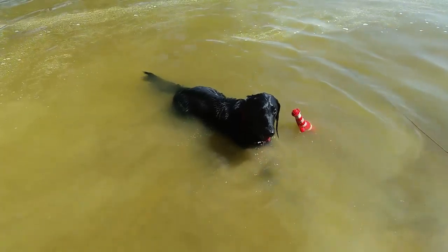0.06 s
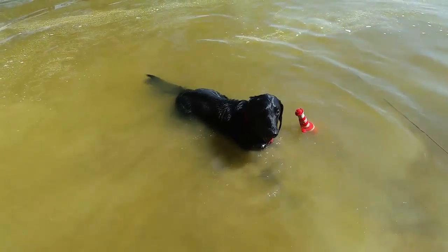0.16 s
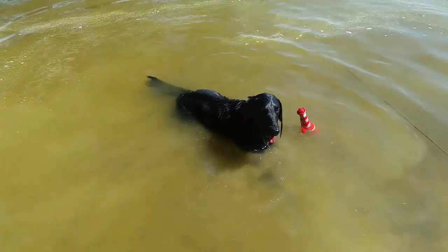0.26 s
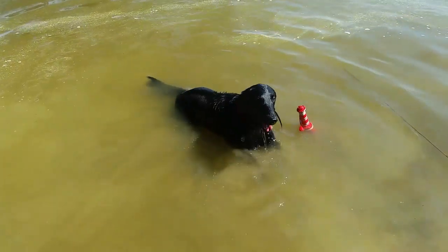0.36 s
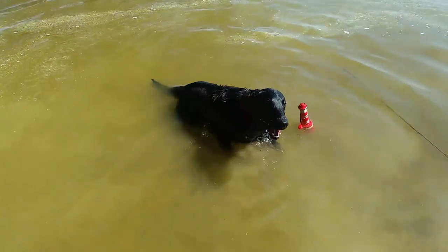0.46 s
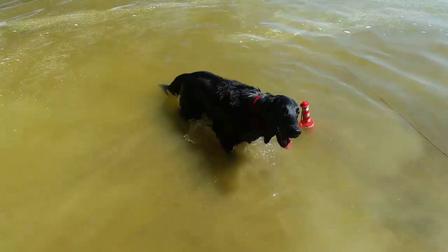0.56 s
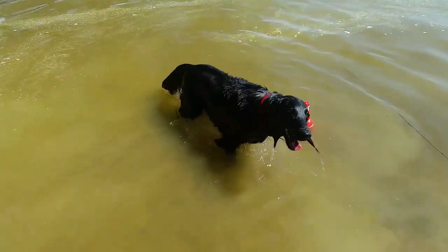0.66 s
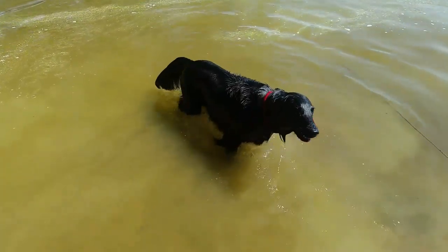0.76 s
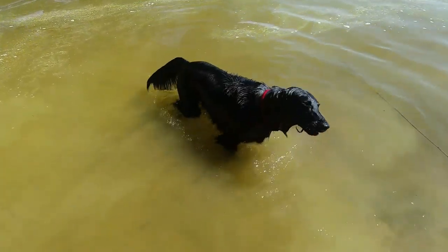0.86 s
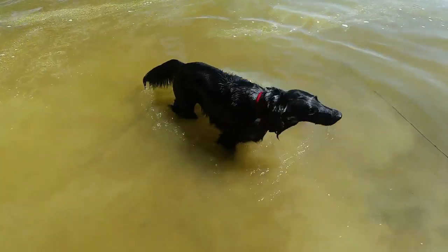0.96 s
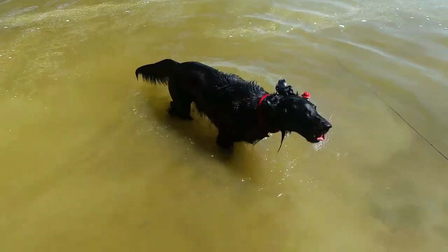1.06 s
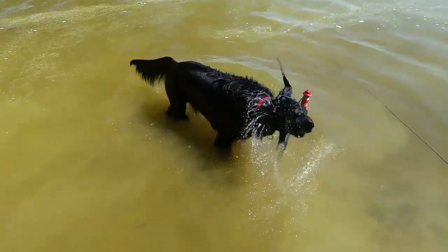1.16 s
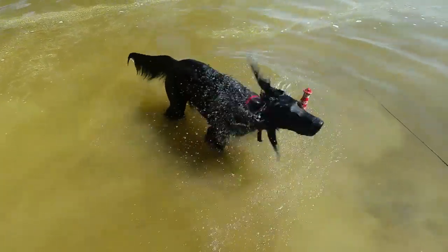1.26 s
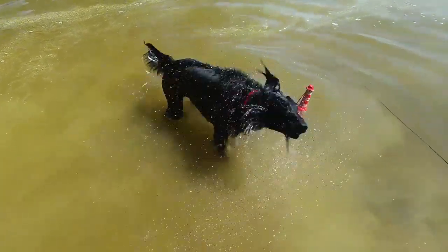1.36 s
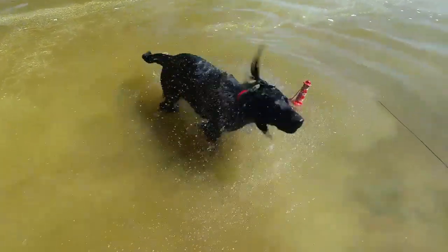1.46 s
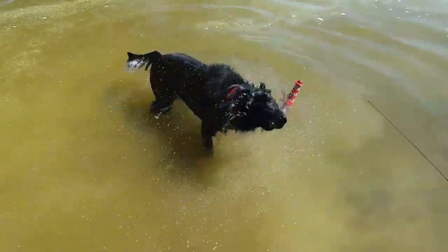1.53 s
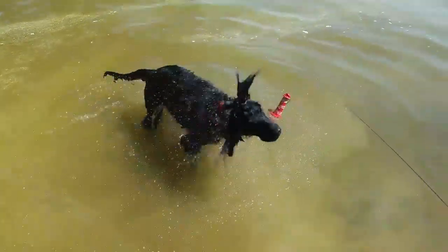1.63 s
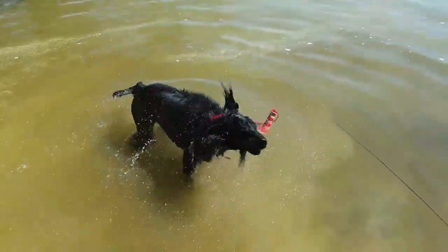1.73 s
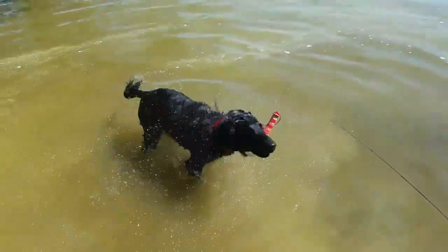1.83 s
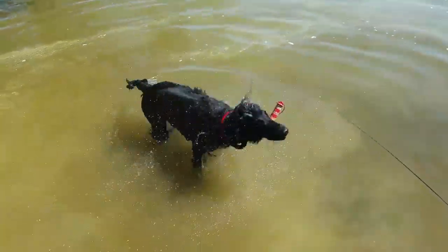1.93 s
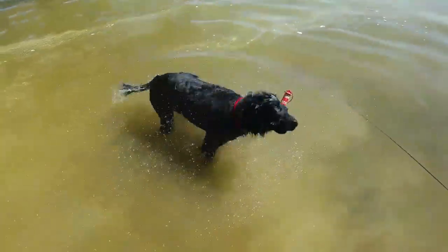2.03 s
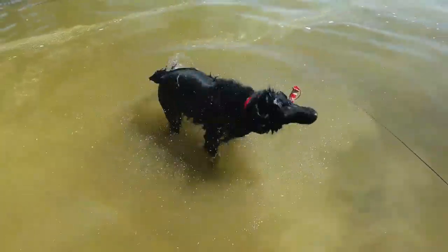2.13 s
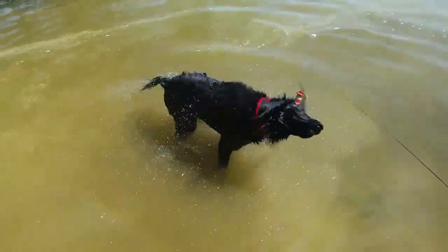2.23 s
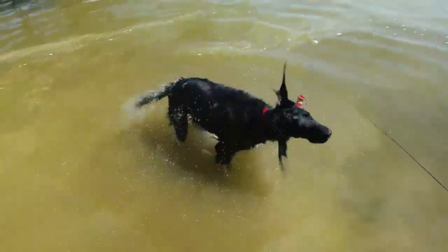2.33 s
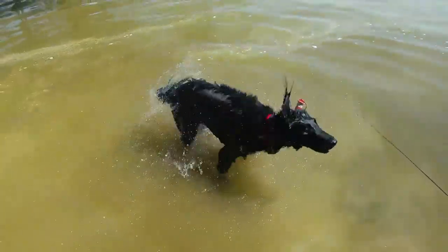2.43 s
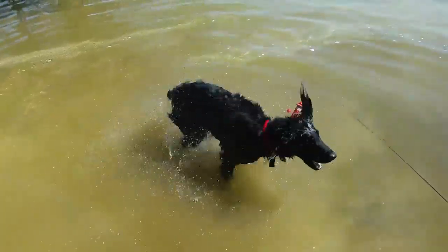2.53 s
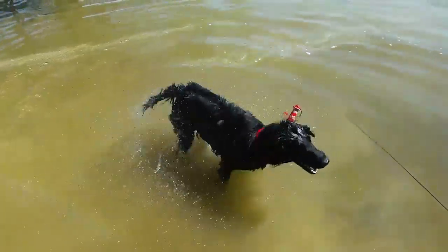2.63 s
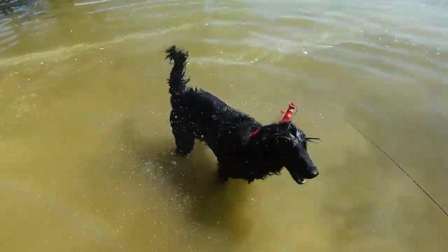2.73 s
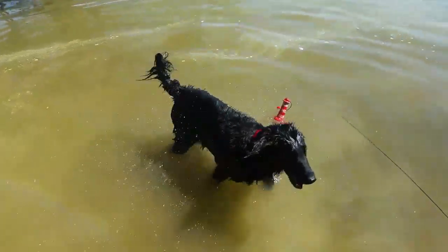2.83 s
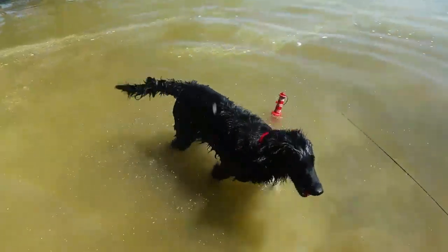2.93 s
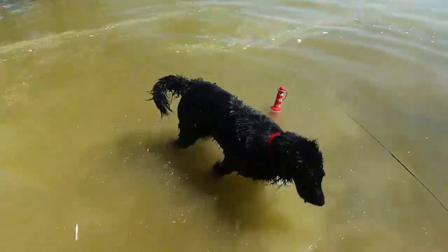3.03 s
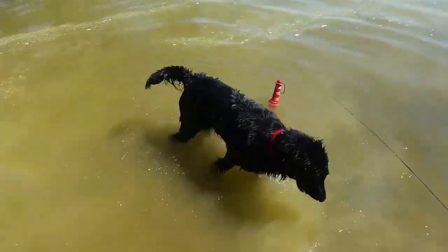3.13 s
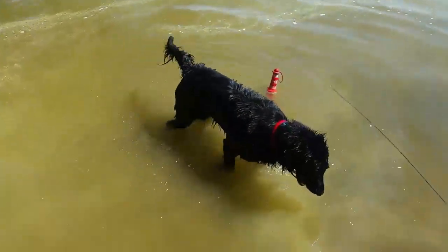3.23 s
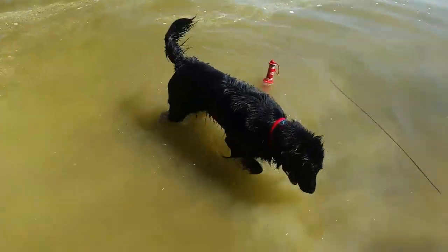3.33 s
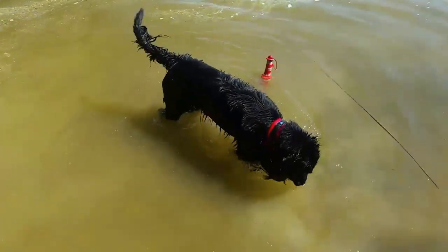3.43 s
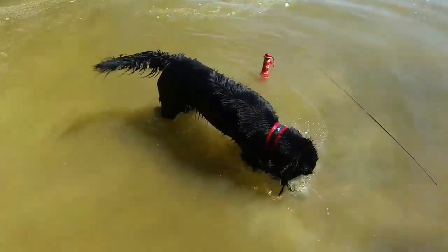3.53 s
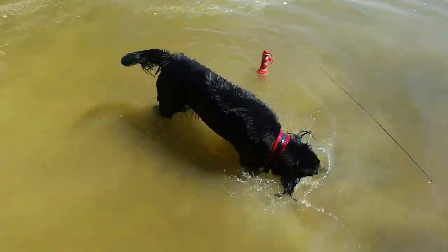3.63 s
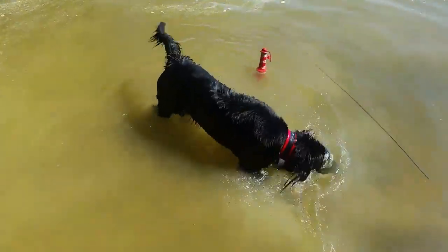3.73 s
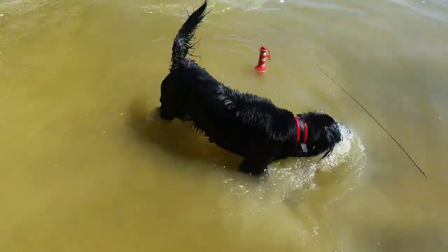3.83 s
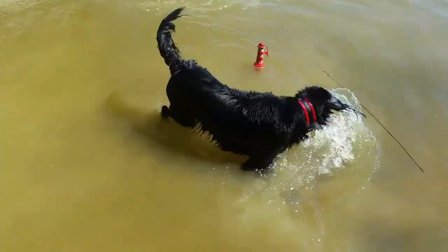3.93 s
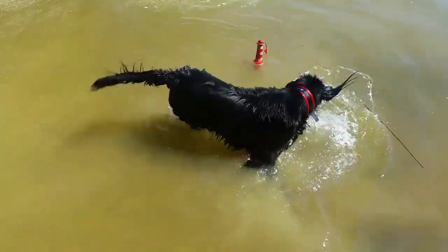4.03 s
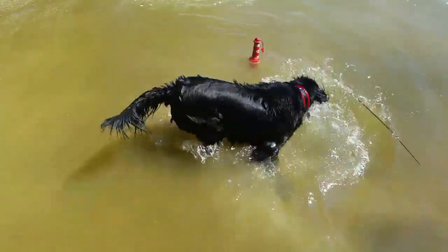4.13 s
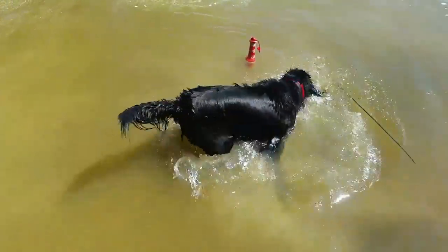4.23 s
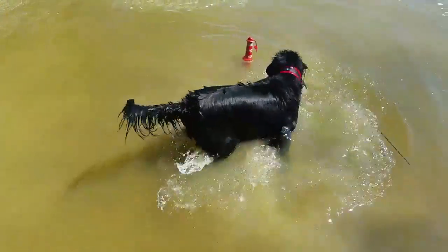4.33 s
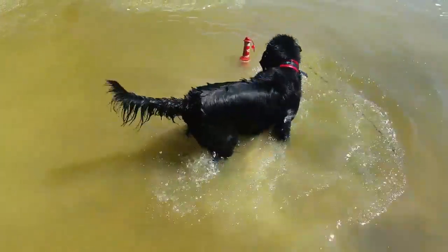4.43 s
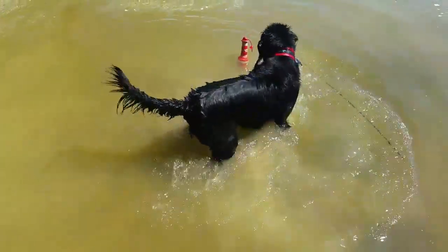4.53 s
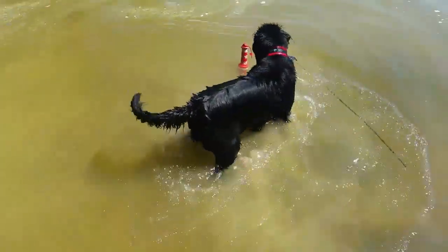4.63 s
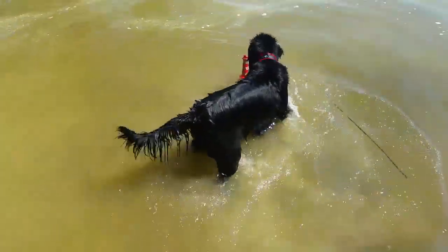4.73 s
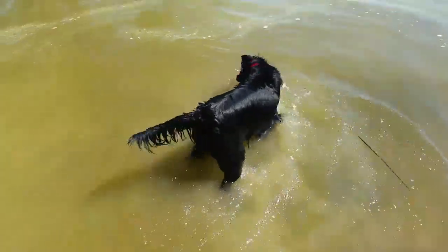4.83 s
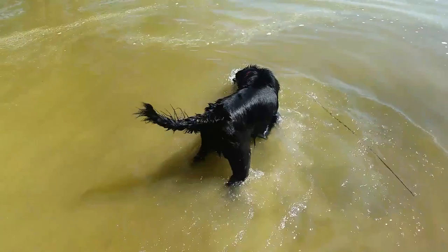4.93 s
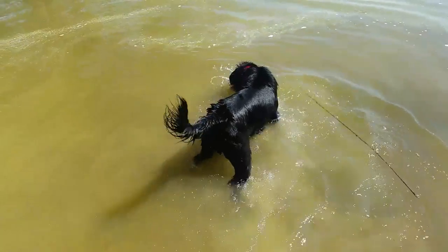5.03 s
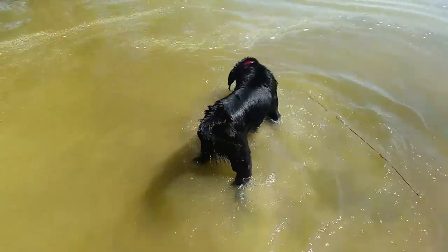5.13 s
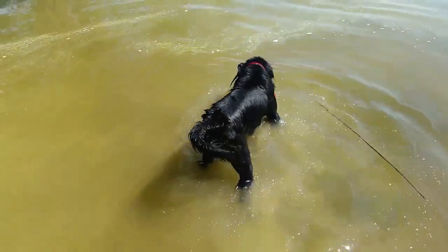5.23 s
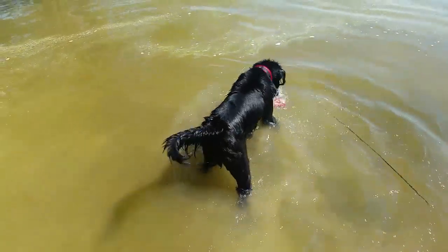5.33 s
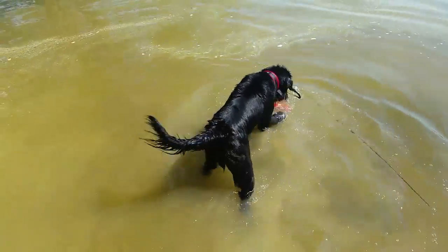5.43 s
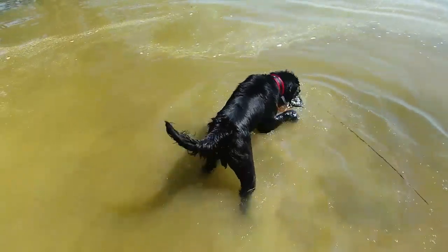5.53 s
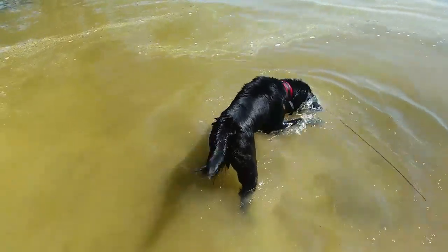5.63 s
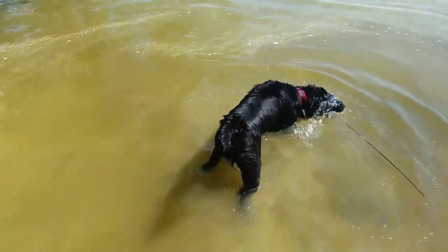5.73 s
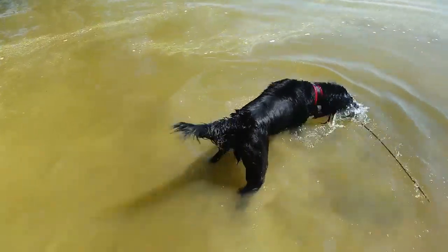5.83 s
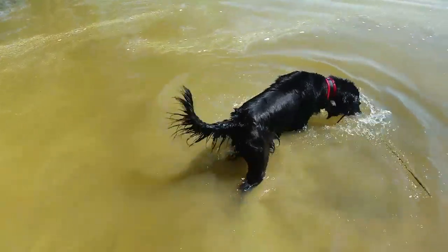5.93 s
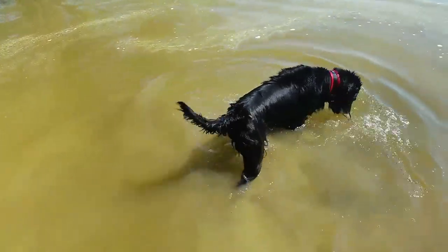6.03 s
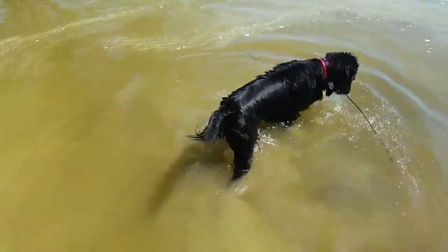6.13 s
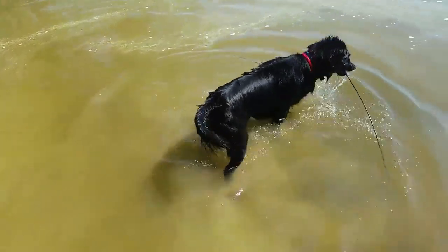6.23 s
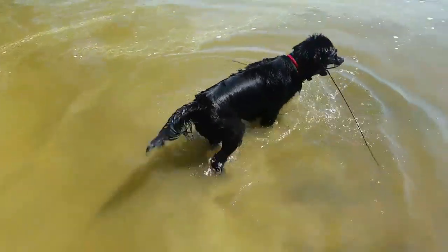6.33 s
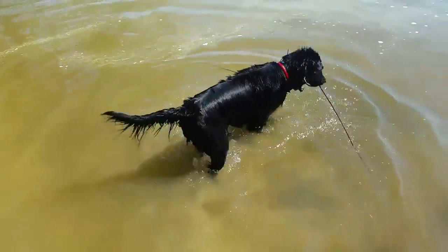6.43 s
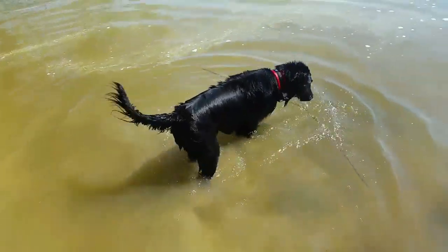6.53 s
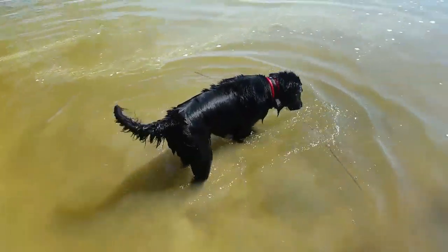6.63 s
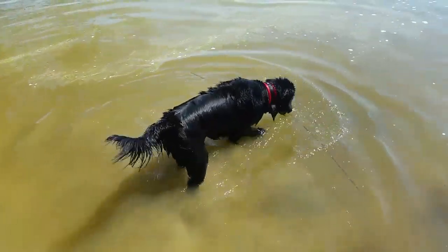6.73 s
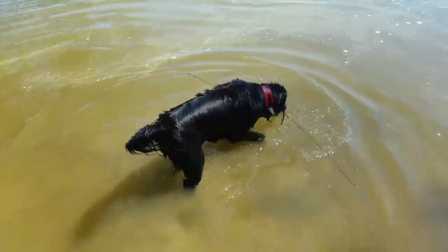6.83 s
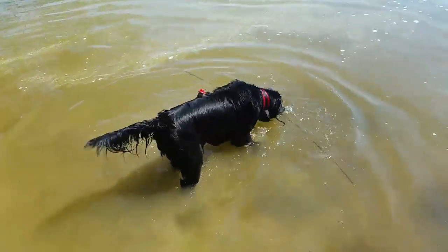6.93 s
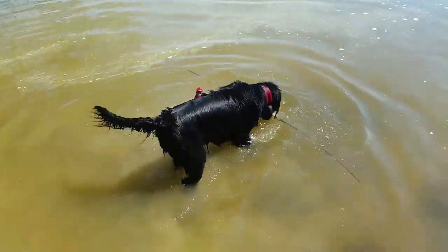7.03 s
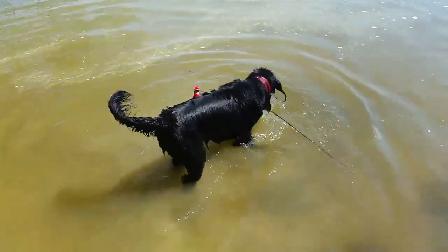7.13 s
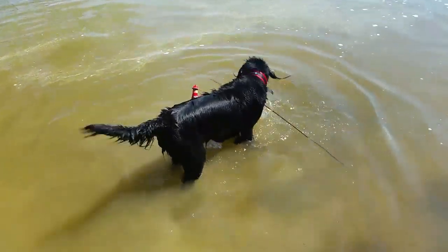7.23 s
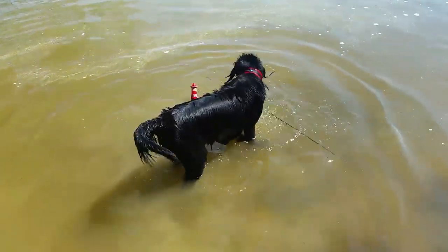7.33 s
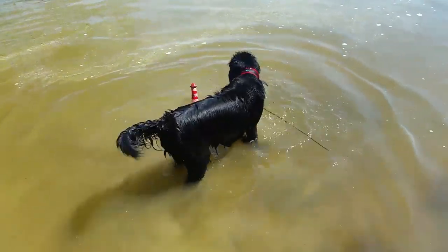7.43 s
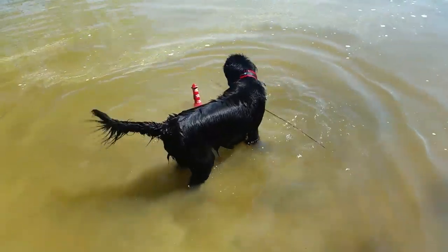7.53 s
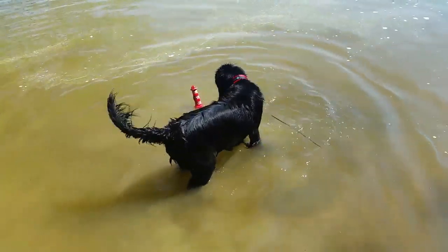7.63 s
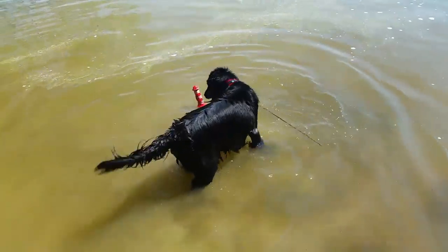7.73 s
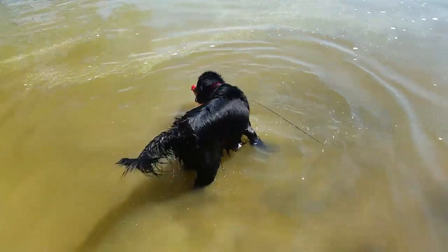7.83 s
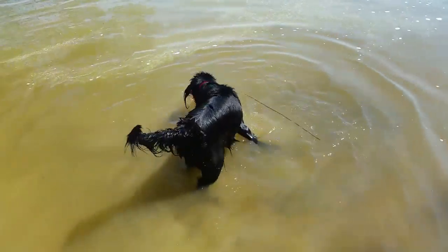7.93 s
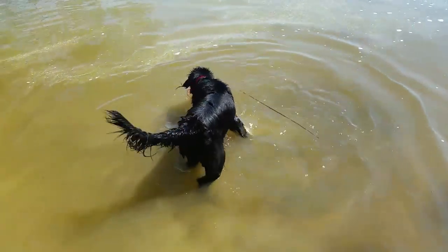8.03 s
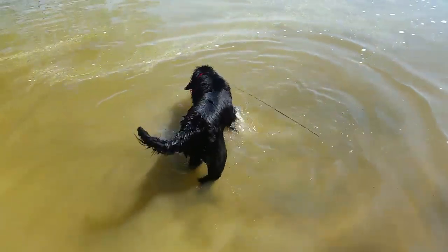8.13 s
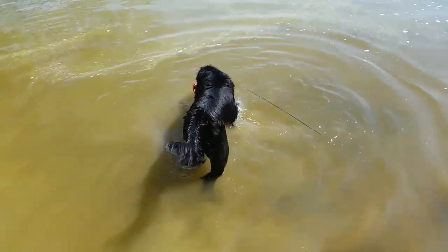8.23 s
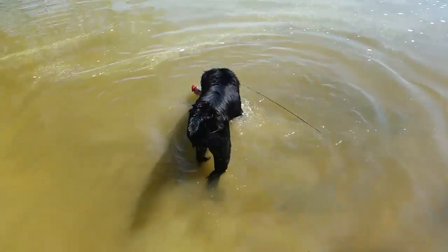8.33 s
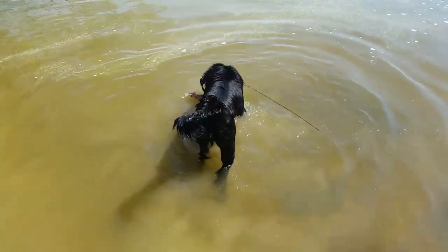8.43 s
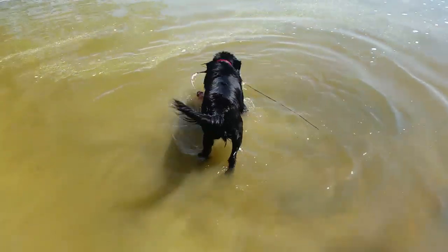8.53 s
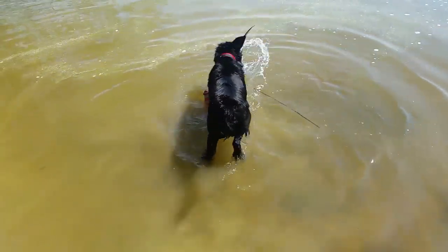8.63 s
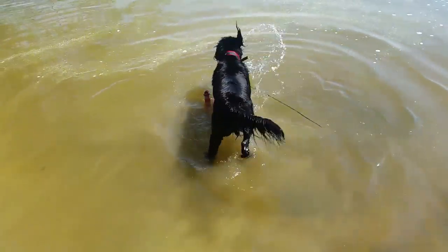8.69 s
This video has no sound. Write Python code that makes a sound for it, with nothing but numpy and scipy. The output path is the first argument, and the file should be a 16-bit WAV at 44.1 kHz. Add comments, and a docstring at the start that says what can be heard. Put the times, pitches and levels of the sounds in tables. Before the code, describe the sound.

Outdoors at a shallow lake, a dog moves close by; wind rumbles low and thumps softly on the microphone throughout, over faint shore wash and a thin steady hiss on the left. A small slosh opens, then near quiet; at 0.5-0.9 s the dog rises with splashes and draining water. At about 1.2 s wet lips flutter briefly, then from 1.3 to 2.5 s ears slap hard and evenly, about eleven times a second, amid fine spray. A deep plop and surge come at 3.0 s. From 3.55 to 4.4 s digging is busiest: gulps, splats, churning and showers of drops, with strong wind thumps. Looser wading follows, with more splashing at 5.8-6.3 s. It then thins to occasional gurgles, with four faint distant bird peeps between 6.7 and 7.5 s. Small plinks and drips gather around 8-8.4 s; a cluster of hollow gulps at 8.6 s ends it.

```python
"""Wet dog shaking and wading

A dog stands up in a shallow lake and shakes: filtered impacts flutter its lips, hard pulses slap its ears.
It wades and digs for a stick: ringing bubbles gulp and plink, noise bursts splat, tiny pings rain as spray.
Low filtered noise rumbles and thumps as wind on the microphone, a thin noise band hisses on the left,
a faint wash lies along the shore and gliding sines peep four times as a far bird."""
import sys
import numpy as np
from scipy import signal
from scipy.fft import rfft, irfft
from scipy.io import wavfile
from scipy.ndimage import uniform_filter1d

SR = 44100
rng = np.random.default_rng(int(sys.argv[2]) if len(sys.argv) > 2 else 0)


def digitize_waveform(pressure):
    """Quantize a signal to 16-bit integers and store it at the path in sys.argv[1].

    Rows of a 2-D input are taken as channels; values are limited to [-1, 1].
    """
    field = np.atleast_2d(pressure).T
    bounded = np.clip(field, -1, 1)
    quanta = np.round(bounded * 32767).astype(np.int16)
    wavfile.write(sys.argv[1], SR, quanta)


N = 386316  # length in samples


def from_db(db):
    """Decibels to gain."""
    return 10 ** (np.asarray(db) / 20)


def rms_one(x):
    """Scale to unit rms."""
    return x / np.sqrt(np.mean(x ** 2) + 1e-20)


def in_time(rows):
    """Each column of an automation curve at every sample."""
    s, *columns = np.transpose(rows)
    return [np.interp(np.arange(N) / SR, s, c) for c in columns]


def drift(rate):
    """Smooth random modulation with about `rate` turns a second; unit rms."""
    knots = rng.standard_normal(4000)
    return rms_one(np.interp(np.arange(N) / SR * rate, np.arange(len(knots)), knots))


def add(out, s, sound):
    """Mix a sound in at a time."""
    i = int(np.clip(s * SR, 0, out.shape[-1] - 1))
    out[..., i:i + sound.shape[-1]] += sound[..., :out.shape[-1] - i]


def swell(t, attack_s, hold_s, release_s):
    """Attack, hold and release; silent before t = 0."""
    t = np.maximum(t, 0)
    attack = 1 - np.exp(-t / max(attack_s, 1e-4))
    release = np.exp(-np.maximum(t - hold_s, 0) / max(release_s, 1e-4))
    return attack * release


def colour(x, points, share=1, size=4096):
    """Causal (minimum-phase) EQ through (Hz, dB) points; share scales the dB."""
    hz, db = np.transpose(points)
    grid = np.maximum(np.arange(size // 2 + 1) * SR / size, 1)
    curve_db = share * np.interp(np.log(grid), np.log(hz), db)
    # folding the cepstrum onto positive time makes the phase minimal
    cepstrum = irfft(np.log(from_db(curve_db)))
    cepstrum[1:size // 2] *= 2
    cepstrum[size // 2 + 1:] = 0
    response = irfft(np.exp(rfft(cepstrum)))
    return signal.oaconvolve(np.atleast_2d(x), response[None], axes=1)[:, :x.shape[-1]]


def tilted(points, db_per_octave):
    """A colour made brighter or duller about 1 kHz."""
    return [(hz, db + db_per_octave * np.log2(hz / 1000)) for hz, db in points]


RESONANCE_OCTAVES = 0.33  # from the centre to half the lift in dB


def peaked(points, centre_hz, lift_db):
    """A colour with one broad resonance added."""
    hz, db = np.transpose(points)
    grid = np.geomspace(50, 20000, 90)
    lift = lift_db / (1 + (np.log2(grid / centre_hz) / RESONANCE_OCTAVES) ** 2)
    return np.column_stack([grid, np.interp(np.log(grid), np.log(hz), db) + lift])


def steady(x, window_s):
    """Level out over a short window, so that mainly the fine grain is left."""
    power = uniform_filter1d(np.mean(x, axis=0) ** 2, max(int(window_s * SR), 8))
    return x / np.sqrt(np.abs(power) + 0.0011 * np.mean(power))


def impacts(per_s, spread_db, scatter_s, pan_db):
    """Random drop impacts of uneven size; each lands elsewhere, with its own lag and balance."""
    at = np.flatnonzero(rng.random(N) < per_s / SR)
    draws = rng.standard_normal((4, N // 8))
    lag, pan, a, b = draws[:, at % draws.shape[1]]
    rarity = np.minimum((a * a + b * b) / 2, 4.5)  # exponential in dB
    size = np.sign(a) * from_db(spread_db * rarity)
    right_at = np.clip(at + np.round(lag * scatter_s * SR).astype(int), 0, N - 1)
    out = np.zeros((2, N))
    out[0, at] = size * from_db(pan_db * pan)
    out[1, right_at] = size * from_db(-pan_db * pan)
    return out


def bubble(hz, cycles, rise, attack):
    """An air pocket swells, rings and dies; its pitch rises as it nears the surface. Peak about 1."""
    age = np.arange(int(6 * cycles / hz * SR)) / SR * hz / cycles  # in decay times, as is the attack
    envelope = (1 - np.exp(-(age / attack) ** 2)) * np.exp(-age)
    ring = np.sin(2 * np.pi * cycles * (age + rise * (age ** 2 / 2 - age)))
    return envelope / envelope.max() * ring


def bubble_cloud(low_hz, high_hz, cycles, spread_db, rise, count, size=N):
    """Bubbles of all sizes are born at random around the legs."""
    out = np.zeros((2, size))
    for when, pitch, strength, life, place, sign in rng.random((count, 6)):
        hz = low_hz * (high_hz / low_hz) ** pitch
        ring = bubble(hz, cycles * 2 ** (2 * life - 1), rise, attack=0.32)
        rarity = -np.log(strength + .03)
        ring *= np.sign(sign - .5) * from_db(spread_db * rarity)  # most are faint, a few louder
        add(out[0], when * size / SR, ring)
        add(out[1], when * size / SR + (place - .5) * 0.0003, ring)
    return out


def burst(attack_s, decay_s, points, alike, ragged_db=0, size=4096):
    """A crackle of water that swells and dies in uneven spurts; its mono rms is 1 over the first 5 ms."""
    t = np.arange(size) / SR
    knots = np.clip(rng.standard_normal(64), -1.5, 1.5)
    spurts = np.interp(t, np.linspace(0, t[-1], 64), knots)
    envelope = (1 - np.exp(-(t / attack_s) ** 2)) * np.exp(-t / max(decay_s, 1e-4))
    envelope = envelope * from_db(ragged_db * spurts * (1 - np.exp(-t / decay_s)))
    mid, side = rng.standard_normal((2, size)) * envelope
    alike = np.clip(alike, 0, 1)  # 1 makes both channels equal
    x = colour(np.sqrt(1 + alike) * mid + np.sqrt(1 - alike) * side * [[1], [-1]], points)
    return x / np.sqrt(np.mean(x.mean(axis=0)[t < .005] ** 2))


# wet ears smack at every half turn of the shake:
# [t/s, level/dB before layer trims, decay/s, hollow under the ear f/Hz, brightness/dB per octave]
SLAPS = [(1.282, -25, 0.0073, 1100, 5.5), (1.385, -19.5, 0.0024, 900, 0.5), (1.486, -17, 0.0023, 1950, 3),
         (1.581, -23.5, 0.0049, 990, 2), (1.672, -24, 0.0045, 700, -0.5), (1.763, -21.5, 0.0012, 930, 0.5),
         (1.852, -20, 0.0011, 980, 0.5), (1.946, -26.5, 0.0014, 1300, 0), (2.03, -21.5, 0.0011, 1530, 2.5),
         (2.117, -15, 0.0016, 990, 1.5), (2.201, -17, 0.0022, 835, 0.5), (2.292, -18.5, 0.0022, 1000, 0),
         (2.373, -20.5, .002, 950, -1), (2.457, -30, 0.0054, 1600, -0.5), (2.536, -23, 0.0036, 1400, 1)]
# body of a smack [f/Hz, level/dB]
SLAP_COLOUR = [(80, 0), (250, 6.5), (550, -7), (950, 3.5), (1300, -5.5), (1600, -8), (2200, -2.5),
               (2900, -17), (3800, -11), (6000, -18.5), (12000, -37)]
HOLLOW_DB = 4  # lift at the pitch of the hollow
# spray noise at each smack, before layer trims
SPRAY_DECAY_S, SPRAY_DB, SPRAY_GROWTH_DB_PER_S = 0.0023, -18, 0.1


def slaps():
    """Wet fur smacks: a hard pulse and ragged spatter, each in its own tone; faint spray noise swells around it."""
    out = np.zeros((2, N))
    for s, level_db, decay_s, hz, brightness_db in SLAPS:
        tone = peaked(tilted(SLAP_COLOUR, brightness_db), hz, HOLLOW_DB)
        smack = colour(signal.unit_impulse(2048), tone)
        spray_db = SPRAY_DB + SPRAY_GROWTH_DB_PER_S * (s - SHAKE_START_S)
        add(out, s + 0.001378, from_db(level_db + 2.0) * smack / np.abs(smack).max())
        add(out, s, from_db(level_db - 4.0) * burst(0.0013, decay_s, tone, alike=0.95, ragged_db=4))
        add(out, s, from_db(level_db - 17.5) * burst(0.00094, 0.012, tone, alike=0.64, ragged_db=9))
        short_spray = burst(0.0012, SPRAY_DECAY_S, SPRAY_COLOUR, alike=0.089, ragged_db=4.0)
        faint_spray = burst(0.0038, 0.0094, SPRAY_COLOUR, alike=0.099, ragged_db=10.0)
        add(out, s, from_db(spray_db - 6.5) * short_spray)
        add(out, s - .007, from_db(spray_db - 20.0) * faint_spray)
    return out


# the hollow of the mouth colours the flutter [f/Hz, level/dB]
FLUTTER_COLOUR = [(200, 2.5), (550, -12), (700, 2), (780, 6.5), (940, -8.5), (1200, -32), (1650, -9),
                  (1900, -20), (2600, -36), (6000, -48)]
FLUTTER_START_S, FLUTTER_LENGTH_S, FLUTTER_DB = 1.177, 0.079, -30  # as the head starts to turn


def flutter():
    """Wet lips flap in a quick uneven run and ring in the mouth."""
    flaps = impacts(per_s=500, spread_db=2.0, scatter_s=.00005, pan_db=-0.5)[:, :SR // 3]
    flaps = colour(flaps, FLUTTER_COLOUR)
    t = np.arange(SR // 3) / SR
    envelope = swell(t, attack_s=0.0016, hold_s=FLUTTER_LENGTH_S, release_s=0.024)
    out = np.zeros((2, N))
    add(out, FLUTTER_START_S, from_db(FLUTTER_DB) * envelope * steady(flaps, window_s=0.043))
    return out


# the dog stands up and its coat drains, before MOVING_DB:
# [t/s, low gurgle level/dB, mid splashing level/dB, high spray level/dB]
RISING = [(0.0, -37, -38.5, -50.5), (0.1, -53.5, -53, -71), (0.192, -63, -77, -69), (0.42, -54, -61, -77),
          (0.55, -46.5, -52, -57), (0.678, -37, -45.5, -48.5), (0.86, -47.5, -50, -50.5),
          (0.92, -51, -62, -56), (1.15, -59, -61, -65)]
# it wades and digs for the stick, before MOVING_DB:
# [t/s, low gurgle level/dB, mid splashing level/dB, high spray level/dB]
WADING = [(2.85, -39.5, -46.5, -46), (3.01, -44, -47, -47.5), (3.21, -50, -51.5, -60.5),
          (3.489, -42.5, -50, -49), (3.79, -37, -54.5, -52.5), (3.92, -38, -44.5, -44),
          (4.28, -35.5, -40.5, -36.5), (4.63, -41.5, -47, -47), (4.84, -43.5, -54.5, -51.5),
          (5.04, -44, -60, -50.5), (5.43, -44.5, -48, -53), (5.71, -42.5, -51.5, -48.5),
          (5.96, -38, -42.5, -47), (6.12, -34.5, -39, -39), (6.26, -41, -49.5, -48),
          (6.57, -48.5, -44, -45), (6.78, -57, -57.5, -55), (7.24, -48, -52.5, -60),
          (7.49, -56.5, -61, -61.5), (7.72, -49.5, -56, -67.5), (7.87, -45, -49, -60),
          (8.22, -49.5, -51, -55.5), (8.35, -36.5, -46, -49.5), (8.48, -39, -52, -57),
          (8.76, -57, -51, -53)]
# triples run gurgle, splashing, spray; each layer adds its own trim later
MOVING_DB = (-0.5, 0, -2.5)  # gain on both movements
SHAKE_START_S, SHAKE_END_S, SHAKE_ATTACK_S, SHAKE_RELEASE_S = 1.117, 2.744, 0.14, 0.02
SHAKE_DB = (-41, -46.5, -36.5)
# from head to rump the splashing grows while gurgle and spray fall
SHAKE_GROWTH_DB_PER_S = (-11.5, 2.5, -0.84)
SHAKE_PULSE_DB, SHAKE_PULSE_LAG = 1, .12  # swing; delay after each smack, share of a half turn
WAKE_DB, WAKE_DECAY_S = (-10, -12, -16), 0.1  # against the surge that leaves the wake


def agitation():
    """Levels of gurgle, splashing and spray (dB): movements, pulsing shake and surge wakes add as power."""
    t = np.arange(N) / SR
    shake_length_s = SHAKE_END_S - SHAKE_START_S
    shake = swell(t - SHAKE_START_S, SHAKE_ATTACK_S, shake_length_s, SHAKE_RELEASE_S)
    half_turns = np.interp(t, [row[0] for row in SLAPS], np.arange(len(SLAPS)))
    pulse = np.cos(2 * np.pi * (half_turns - SHAKE_PULSE_LAG)) - .5
    shake = shake * from_db(SHAKE_PULSE_DB * pulse)
    shaken_s = np.clip(t, SHAKE_START_S, SHAKE_END_S) - SHAKE_START_S
    wake_power = sum((from_db(db) * swell(t - s, length_s, length_s, WAKE_DECAY_S)) ** 2
                     for s, db, _, length_s, _ in SURGES)
    levels = []
    for moving, gain_db, shake_db, growth_db, wake_db in zip(
            in_time([*RISING, *WADING]), MOVING_DB, SHAKE_DB, SHAKE_GROWTH_DB_PER_S, WAKE_DB):
        moving_power = from_db(moving + gain_db) ** 2
        shake_power = (from_db(shake_db + growth_db * shaken_s) * shake) ** 2
        levels.append(10 * np.log10(moving_power + shake_power + from_db(wake_db) ** 2 * wake_power))
    return levels


# fine spray, also heard at each slap [f/Hz, level/dB]
SPRAY_COLOUR = [(1500, -4), (2900, -12), (3700, -7.5), (4900, -3), (6200, -9.5), (7800, -2), (9000, -5.5),
                (12000, 5), (14000, 0), (16000, -4.5)]


def spray(level_db):
    """Fine drops rain back, each pinging briefly in one band; more spray means more drops a second."""
    per_s = 1300 * from_db(0.37 * (level_db + 38.5) + 6.5 * drift(60))
    edges = np.geomspace(2000, 16000, 10)
    pings = np.zeros((2, N))
    for band in zip(edges, edges[1:]):
        ringing = signal.butter(2, band, "band", fs=SR, output="sos")
        hits = impacts(per_s, spread_db=4.5, scatter_s=.00006, pan_db=3.0)
        pings += signal.sosfilt(ringing, hits + 1e-18)
    patter = steady(colour(pings, SPRAY_COLOUR), window_s=0.17)
    mist = rms_one(colour(rng.standard_normal((2, N)), SPRAY_COLOUR))
    return from_db(level_db - 2.0) * (patter + mist)


# breaking water [f/Hz, level/dB]
SPLASH_COLOUR = [(450, -3), (800, 3), (1050, -5), (1300, -6), (1650, 5.5), (2100, 5), (2450, 0.5),
                 (2900, -5), (3700, -5), (5000, -16), (8000, -39)]


def splash(level_db):
    """Breaking water: small bubbles and sharp splats that come in flurries."""
    bubbles = bubble_cloud(925.0, 4874, cycles=7.4, spread_db=4.0, rise=0.019, count=5500)
    bubbles = rms_one(colour(bubbles, SPLASH_COLOUR))
    sharp = impacts(per_s=2200, spread_db=1.5, scatter_s=.00005, pan_db=5.5)
    sharp = rms_one(colour(sharp * from_db(4.1 * drift(70)), SPLASH_COLOUR))
    return from_db(level_db - 0.9) * steady(bubbles + from_db(-2.0) * sharp, window_s=0.17)


# churned water [f/Hz, level/dB]
GURGLE_COLOUR = [(120, -18.5), (230, 0), (400, 3), (580, 2.5), (800, 6.5), (1000, 2.5), (1300, 0.5),
                 (2000, -64.5)]


def gurgle(level_db):
    """Churned water: large bubbles over the patter of falling lumps of water."""
    bubbles = bubble_cloud(219.0, 1135, cycles=4.06, spread_db=5.5, rise=0.07, count=2600)
    bubbles = rms_one(colour(bubbles, GURGLE_COLOUR))
    lumps = impacts(per_s=1500, spread_db=4.5, scatter_s=.00008, pan_db=4.5)
    lumps = rms_one(colour(lumps, GURGLE_COLOUR))
    return from_db(level_db) * steady(bubbles + from_db(-10.0) * lumps, window_s=0.086)


# a sheet of water is thrown up and collapses:
# [t/s, level/dB, swell/s, length/s, brightness/dB per octave]
SURGES = [(0.0, -48, .003, 0.048, 2.5), (0.492, -33, 0.012, 0.076, 0.5), (0.713, -41, 0.0024, 0.027, 4.5),
          (1.137, -39, .003, 0.0088, -1.5), (2.424, -33.5, 0.0051, 0.037, 3),
          (2.546, -41, .003, 0.063, 5.5), (3.038, -27, 0.015, 0.059, -2.5),
          (3.554, -33.5, 0.021, 0.07, -0.5), (3.603, -39, 0.0037, 0.069, 8),
          (3.691, -37.5, 0.0028, 0.051, 6), (4.13, -27, 0.021, 0.027, 2), (4.383, -43, .003, 0.053, 3),
          (4.625, -37.5, 0.0034, 0.018, -1), (4.819, -33, 0.0033, 0.053, -8),
          (4.964, -40.5, 0.002, 0.039, 3.5), (5.829, -29.5, 0.0073, 0.042, -8),
          (5.976, -40.5, .006, 0.14, -1.5), (7.95, -40.5, 0.0027, 0.018, -2),
          (8.318, -42, 0.0054, 0.033, -10), (8.532, -29.5, 0.021, 0.098, -6.5)]
# rushing water [f/Hz, level/dB]
SURGE_COLOUR = [(150, -4), (400, 2.5), (580, -0.5), (820, 9), (1050, 2.5), (1350, -0.5), (1650, 1.5),
                (2150, 0.5), (2900, -13.5), (3800, -9.5), (6000, -20.5), (9000, -18.5), (12000, -12),
                (16000, -34)]
SURGE_DRAIN_S, SURGE_RAGGED_DB = 0.03, 3  # shared drain time; unevenness before levelling


def surges():
    """A collapsing sheet is a dense, uneven rush of impacts and bubbles that swells, holds and drains away."""
    size = SR // 3
    t = np.arange(size) / SR
    out = np.zeros((2, N))
    patter = rms_one(impacts(per_s=4000, spread_db=2.0, scatter_s=.00007, pan_db=-3.0))
    for k, (s, level_db, swell_s, length_s, brightness_db) in enumerate(SURGES):
        bubbles = rms_one(bubble_cloud(340.7, 2398, cycles=5.9, spread_db=0.5, rise=0.079,
                                       count=200, size=size))
        mix = patter[:, k * size:(k + 1) * size] + from_db(-16.0) * bubbles
        rush = colour(mix, tilted(SURGE_COLOUR, brightness_db))
        ragged = rush * from_db(SURGE_RAGGED_DB * drift(257)[:size])
        envelope = swell(t, swell_s, length_s, SURGE_DRAIN_S)
        add(out, s, from_db(level_db) * envelope * steady(ragged, window_s=0.015))
    return out


# the largest trapped air pockets ring [t/s, level/dB, f/Hz, cycles to decay]
PLOPS = [(0.008, -33, 282, 8), (0.559, -26.5, 374, 3.2), (1.178, -20, 748, 5.7), (1.178, -27, 1910, 12),
         (2.611, -22, 1520, 5.4), (2.818, -32, 324, 6.1), (3.008, -16, 332, 3.2), (3.623, -19, 1060, 3.3),
         (3.633, -18.5, 657, 2.5), (3.665, -20.5, 459, 4.3), (3.71, -15, 433, 1.7), (3.751, -19, 266, 1.15),
         (3.886, -21.5, 926, 5.5), (4.152, -19.5, 435, 4.1), (4.27, -15.5, 353, 4.2),
         (4.389, -19.5, 980, 4.7), (4.627, -23, 1050, 3.8), (4.764, -22.5, 210, 2), (4.819, -26, 900, 1.6),
         (4.849, -29, 430, 2.9), (4.98, -25, 964, 4.7), (5.42, -24, 403, 1.5), (5.678, -29.5, 417, 1.8),
         (5.765, -22, 382, 1.8), (5.877, -21, 350, 3.4), (5.975, -22.5, 714, 5.2),
         (6.007, -24.5, 1090, 3.6), (6.147, -20, 747, 5.1), (6.273, -21, 218, 1.9), (6.764, -38, 845, 8),
         (7.031, -19.5, 416, 1.6), (7.339, -33.5, 1800, 3.7), (7.625, -42, 990, 11),
         (7.692, -33.5, 418, 3.3), (7.958, -30.5, 305, 3.2), (8.007, -40, 770, 7.7), (8.077, -40, 2050, 8),
         (8.147, -28.5, 2120, 7.7), (8.18, -27, 556, 1.5), (8.3, -20, 2000, 4.7), (8.347, -27, 450, 3.5),
         (8.363, -29, 2350, 4.8), (8.385, -36, 713, 3.6), (8.424, -24, 1630, 4.8), (8.586, -13, 480, 1.9),
         (8.612, -14.5, 435, 1.6), (8.624, -19, 486, 2.4), (8.638, -17.5, 467, 1.7)]
# bubbles just under the surface chirp upward [t/s, level/dB, f/Hz]
PLINKS = [(2.552, -18, 976), (3.357, -30.5, 1090), (5.279, -25, 543), (7.755, -40, 1100),
          (8.707, -34, 1180)]
PLOP_RISE, PLINK_RISE, PLINK_CYCLES = .03, .16, 5.7  # pitch rise, share per decay time; cycles to decay
# opening smack and smaller bubbles: dB against the pocket, s, octaves above it
PLOP_SMACK_DB, SHED_DB, SHED_WITHIN_S, SHED_OCTAVES = -35, -14, 0.046, 1.07


def plops():
    """Paws, muzzle and drips drag air under: deep pockets smack, gulp and shed bubbles, shallow ones plink."""
    out = np.zeros((2, N))
    for s, level_db, hz in PLINKS:
        add(out, s, from_db(level_db) * bubble(hz, PLINK_CYCLES, PLINK_RISE, attack=0.23))
    for s, level_db, hz, cycles in PLOPS:
        add(out, s, from_db(level_db) * bubble(hz, max(cycles, 1), PLOP_RISE, attack=0.29))
        add(out, s, from_db(level_db + PLOP_SMACK_DB) * burst(0.0038, 0.0046, SLAP_COLOUR, alike=0.68))
        for delay, smaller in rng.random(size=(3, 2)):
            shed = bubble(hz * 2 ** (SHED_OCTAVES * smaller), cycles=2.1, rise=0.05, attack=0.32)
            add(out, s + SHED_WITHIN_S * delay, from_db(level_db + SHED_DB) * shed)
    return out


# paws, muzzle and flung lumps splat on the surface:
# [t/s, level/dB before layer trims, dent f/Hz, decay/s]
SPLATS = [(0.504, -32, 2210, .006), (0.56, -29, 1330, 0.0033), (0.677, -36.5, 1130, 0.0081),
          (0.715, -35, 1890, 0.0026), (1.294, -31, 1490, 0.0034), (1.548, -36, 1800, 0.005),
          (1.691, -27, 1600, 0.0015), (1.701, -32.5, 1070, 0.0046), (2.142, -34, 3500, 0.0016),
          (2.142, -38, 3500, 0.0017), (2.38, -24, 1090, 0.0021), (2.438, -33, 3500, 0.0025),
          (2.462, -28, 1540, 0.0085), (2.592, -29.5, 1700, 0.0058), (3.118, -31, 620, 0.0013),
          (3.567, -26, 700, 0.0022), (3.593, -30, 1150, .003), (3.614, -26, 1230, 0.0053),
          (3.622, -32, 2540, 0.0079), (3.689, -28, 870, .003), (3.709, -30.5, 1040, 0.009),
          (3.73, -31, 2060, 0.0022), (3.766, -32, 1570, .003), (4.091, -28.5, 1240, .003),
          (4.157, -29, 1910, 0.0044), (4.319, -35, 2120, 0.0049), (4.626, -29.5, 1900, 0.0019),
          (4.852, -33.5, 1800, 0.0051), (5.537, -33.5, 2100, 0.0085), (5.547, -40, 1680, 0.0013),
          (5.706, -38, 2020, 0.0059), (5.985, -34, 900, 0.0062), (6.086, -30.5, 1820, 0.0042),
          (6.263, -37.5, 3840, 0.0033), (6.505, -32.5, 1920, 0.0026), (7.036, -36, 884, 0.0027),
          (8.423, -33, 1650, 0.0017), (8.754, -30.5, 2270, 0.004)]
# shared body of the splats [f/Hz, level/dB]
SPLAT_COLOUR = [(200, -12), (500, -2.5), (900, 6.5), (1400, -5.5), (2300, -5), (3000, -12.5), (4500, -11),
                (7000, -20.5), (14000, -14)]
DENT_DB = 20.5  # lift at the pitch of the dent


def splats():
    """A lump of water dents the surface with a short crack that rings in the dent; a few droplets follow."""
    out = np.zeros((2, N))
    for s, level_db, hz, decay_s in SPLATS:
        dent = peaked(SPLAT_COLOUR, hz, DENT_DB)
        crack = burst(0.00096, decay_s, dent, alike=0.91, ragged_db=2.5)
        droplets = burst(0.0018, 0.015, SPLAT_COLOUR, alike=0.44, ragged_db=6.0)
        add(out, s, from_db(level_db - 2.5) * crack)
        add(out, s + .004, from_db(level_db - 18.0) * droplets)
    return out


# the biggest single drops tick on the surface [t/s, level/dB before trim]
DROPS = [(1.218, -28.5), (1.414, -34), (1.692, -34), (1.968, -27), (2.3182, -23), (3.2196, -42),
         (3.552, -30.5), (3.66, -31), (3.7104, -29), (3.965, -32.5), (4.137, -32), (5.451, -36.5),
         (5.495, -34.5), (5.543, -35), (5.704, -33), (5.883, -31.5), (5.949, -34), (6.445, -37),
         (6.0836, -31), (6.505, -35), (6.59, -37), (7.983, -36.5), (8.177, -36), (8.3006, -26.5),
         (8.715, -38)]
# bright tick of a drop [f/Hz, level/dB]
DROP_COLOUR = [(1500, -25), (3800, 4), (6200, -6), (8500, 0.5), (12000, 15.5), (16000, 2)]
DRIPS_PER_S, DRIPS_DB = 36, -16  # stray drips; dB against the spray level


def drops(shower_db):
    """Big single drops hit with a bright tick; stray ones drip at random, as loud as the spray allows."""
    drips = impacts(DRIPS_PER_S, spread_db=-0.5, scatter_s=.00006, pan_db=6.0)
    out = from_db(shower_db + DRIPS_DB) * rms_one(colour(drips, DROP_COLOUR))
    for s, level_db in DROPS:
        add(out, s, from_db(level_db - 3.5) * burst(0.0008, 0.0028, DROP_COLOUR, alike=0.3))
    return out


# wind on the microphone ports, before the wander [t/s, left level/dB, right level/dB]
WIND = [(0, -33, -32), (0.35, -38.5, -38), (0.5, -35, -32), (0.9, -40, -42.5), (1.3, -34, -31),
        (1.8, -31.5, -27), (1.92, -38, -36), (2.05, -34, -34.5), (2.9, -37, -40.5), (3.7, -32, -27),
        (4.3, -23, -24.5), (4.6, -32, -31.5), (5.2, -32.5, -28), (5.3, -40.5, -43), (5.55, -33.5, -28.5),
        (6.35, -29, -26.5), (6.65, -39.5, -35.5), (6.95, -34, -29.5), (7.25, -40, -40), (8.45, -43.5, -40),
        (8.62, -37.5, -31), (8.76, -43, -41)]
# fluttering eddies [f/Hz, level/dB]
GUST_COLOUR = [(15, -29), (30, -7), (55, 0.5), (90, 3.5), (130, -2), (190, -10), (300, -21.5), (600, -46),
               (2000, -73)]
# deep rumble [f/Hz, level/dB]
RUMBLE_COLOUR = [(12, 1), (30, -12), (60, 12), (100, -6), (200, -17), (600, -63)]
WIND_WANDER_DB, WIND_WANDER_PER_S = 3, 11  # swing between the ports; turns a second
RUMBLE_DB = -42.5  # while a port's gusts stand at -37.5 dB


def wind():
    """Eddies flutter at each microphone port on its own; the deep rumble follows the gusts only partly."""
    wander_db = WIND_WANDER_DB * drift(WIND_WANDER_PER_S) * np.array([[.5], [-.5]])
    port_db = np.array(in_time(WIND)) + wander_db
    eddies = colour(rng.standard_normal((2, N)) * from_db(6.1 * drift(25)), GUST_COLOUR)
    gusts = from_db(port_db) * steady(eddies, window_s=0.065)
    rumble = rms_one(colour(rng.standard_normal((2, N)), RUMBLE_COLOUR))
    return gusts + from_db(RUMBLE_DB + 0.42 * (port_db + 37.5)) * rumble


# the largest eddies thump, timed at their height:
# [t/s, left level/dB before gain, right level/dB before gain, f/Hz]
BUFFETS = [(1.05, -37, -28.5, 125), (1.12, -33, -24, 134), (1.351, -30, -33, 93), (1.55, -34, -24, 126),
           (1.615, -29, -24, 126), (1.701, -25, -19, 140), (1.82, -27, -22.5, 114), (2.24, -29, -43, 84),
           (3.4, -30, -24, 108), (3.77, -30, -14.5, 142), (3.83, -29, -20.5, 133), (4.0, -15.5, -16, 135),
           (4.16, -25, -23, 126), (4.275, -13.5, -23, 125), (4.46, -33, -18, 100), (5.03, -26, -20.5, 99),
           (5.16, -39, -21.5, 132), (5.86, -37, -26, 125), (6.301, -20, -16.5, 114), (6.79, -35, -19, 98),
           (6.86, -29, -29, 114), (7.161, -27.5, -42, 109)]
BUFFET_S, BUFFET_OCTAVES, BUFFET_DB = .11, 0.87, -5  # length, bandwidth, gain


def buffets():
    """A large eddy rolls over the ports and thumps each for a few cycles, at a pitch set by its size."""
    envelope = np.hanning(int(BUFFET_S * SR))
    width = 2 ** (BUFFET_OCTAVES / 2)
    out = np.zeros((2, N))
    for s, left_db, right_db, hz in BUFFETS:
        band = signal.butter(2, [hz / width, hz * width], "band", fs=SR, output="sos")
        swirl = signal.sosfilt(band, rng.standard_normal((2, SR // 2)))
        swirl = swirl[:, -len(envelope):] * envelope  # past the filter's onset
        for port, level_db, thump in zip(out, (left_db, right_db), swirl):
            add(port, s - BUFFET_S / 2, from_db(level_db + BUFFET_DB) * rms_one(thump))
    return out


# bird peeps [t/s, level/dB before layer trims]
PEEPS = [(6.700, -37.5), (6.926, -40), (7.166, -39), (7.402, -40.5)]
# one peep flicks up and slides down [t/s from its start, f/Hz, level/dB]
PEEP = [(0, 2270, -10), (.012, 2536, -18), (.026, 2505, -9), (.036, 2205, -2), (.048, 2040, -3),
        (.066, 1970, -26)]


def bird():
    """Thin gliding sine peeps, no two quite alike, blurred by the bank and followed by its echo."""
    age, hz, db = np.transpose(PEEP)
    t = np.arange(int(age[-1] * SR)) / SR
    out = np.zeros(N)
    for s, level_db in PEEPS:
        glide_hz = np.interp(t, age, hz * (1 + .018 * rng.standard_normal(len(hz))))
        shape_db = np.interp(t, age, db + 3.2 * rng.standard_normal(len(db)))
        peep = from_db(shape_db) * np.sin(2 * np.pi * np.cumsum(glide_hz) / SR)
        scatter = rng.standard_normal(len(t)) * np.exp(-t / 0.033)
        blur = signal.fftconvolve(peep, scatter / np.linalg.norm(scatter))
        add(out, s, from_db(level_db - 5.0) * peep)
        add(out, s, from_db(level_db - 13.0) * blur)
        add(out, s + 0.033, from_db(level_db - 18) * peep)
    return out


# thin hiss [f/Hz, level/dB]
HISS_COLOUR = [(2400, -41), (2800, -7), (3250, 2), (3650, 9), (4200, 6), (4900, -10), (6000, -81)]
# wash of the shore [f/Hz, level/dB]
SHORE_COLOUR = [(100, 6.5), (300, -7), (700, -10), (1300, -11), (1700, -15), (2600, -18.5), (4200, -14),
                (5500, -57), (9000, -35), (15000, -16.5)]
SHORE_DB, HISS_LEFT_DB, HISS_RIGHT_DB = -54, -52.5, -75.5


def background():
    """The faint wash of the shore and a thin steady hiss on the left, both coloured noise."""
    shore = rms_one(colour(rng.standard_normal((2, N)), SHORE_COLOUR))
    hiss = rms_one(colour(rng.standard_normal((2, N)), HISS_COLOUR))
    return from_db(SHORE_DB) * shore + from_db([[HISS_LEFT_DB], [HISS_RIGHT_DB]]) * hiss


# balance of the water, shared out between the ports [f/Hz, left minus right level/dB before the shares]
LEAN = [(150, 5), (300, 2), (550, 6), (950, 3), (1400, 7), (2100, 5), (2600, 1.5), (3500, 14.5),
        (5000, -1.5), (7200, 12.5), (9000, 11), (11000, 5), (16000, -2)]


def scene():
    """The water leans to the left; wind, shore, hiss and bird are mixed in beside it."""
    churn_db, break_db, shower_db = agitation()
    churned = gurgle(churn_db) + splash(break_db) + spray(shower_db) + drops(shower_db)
    left, right = churned + flutter() + slaps() + splats() + surges() + plops()
    water = np.vstack([colour(left, LEAN, share=0.26), colour(right, LEAN, share=-0.83)])
    return from_db(1.5) * water + wind() + buffets() + background() + bird()


def record(dry):
    """A steep elliptic low-pass cuts the top above 16 kHz."""
    return signal.sosfilt(signal.ellip(10, .2, 80, 16000, fs=SR, output="sos"), dry)


dry = scene()
out = record(dry)
digitize_waveform(out)
```